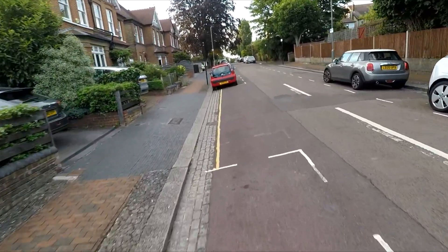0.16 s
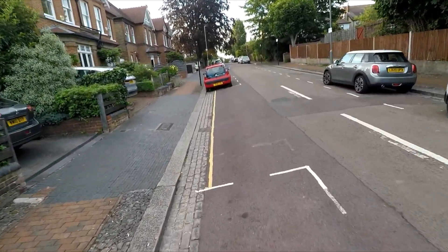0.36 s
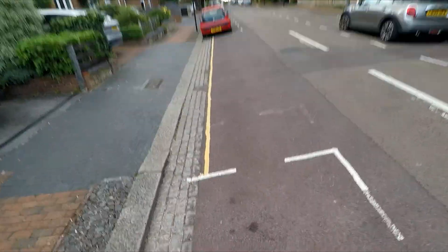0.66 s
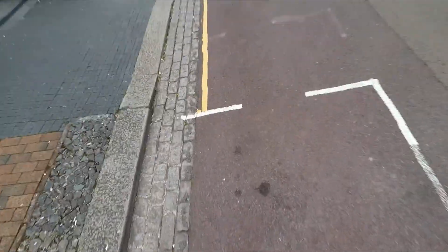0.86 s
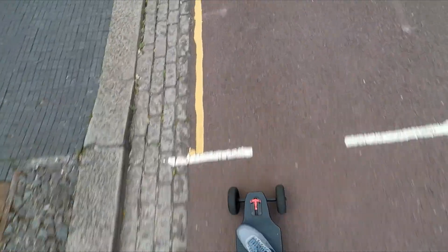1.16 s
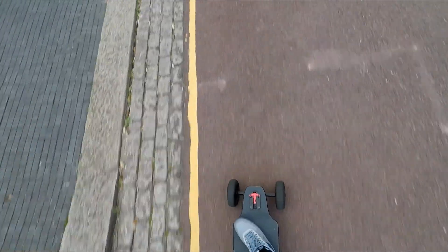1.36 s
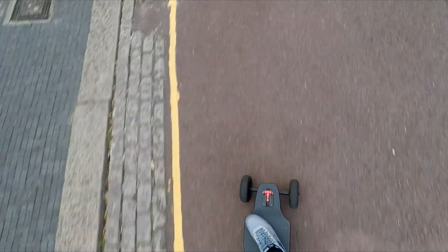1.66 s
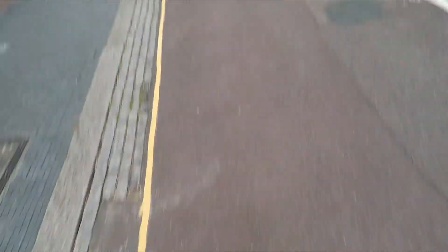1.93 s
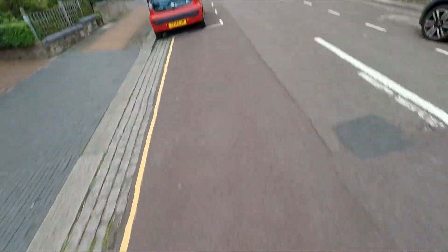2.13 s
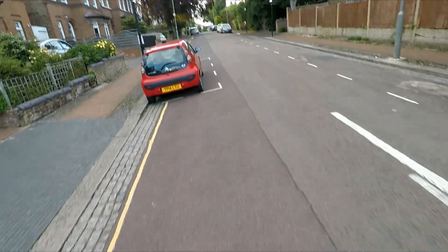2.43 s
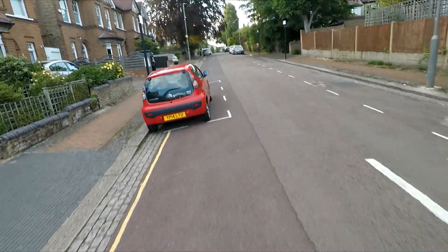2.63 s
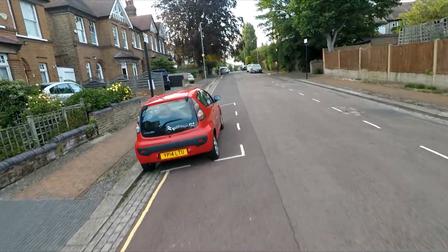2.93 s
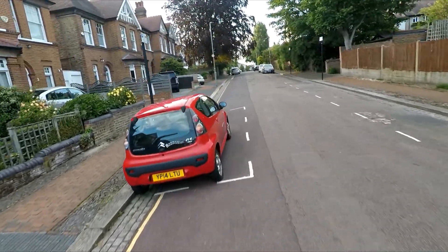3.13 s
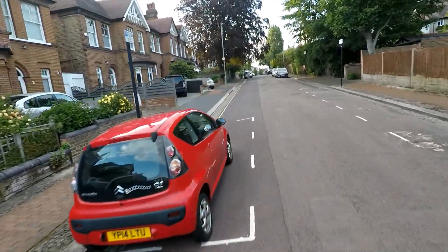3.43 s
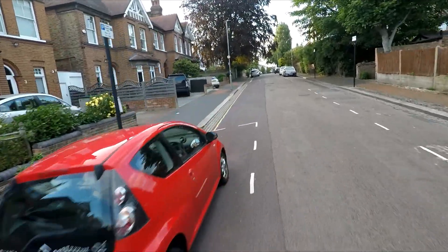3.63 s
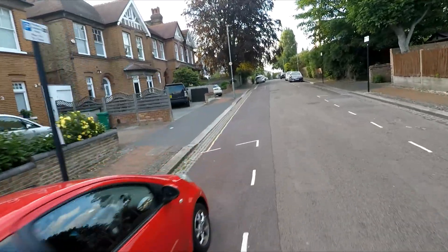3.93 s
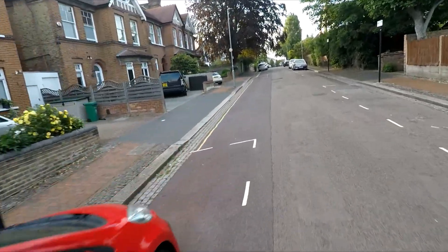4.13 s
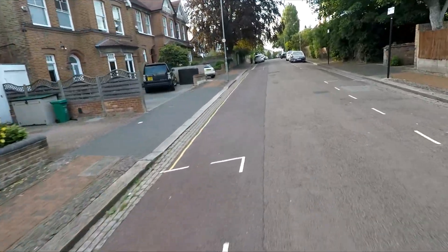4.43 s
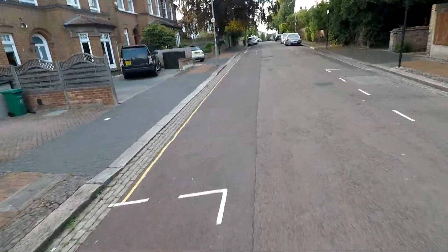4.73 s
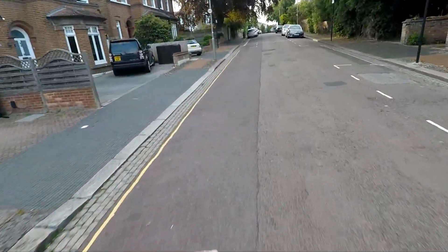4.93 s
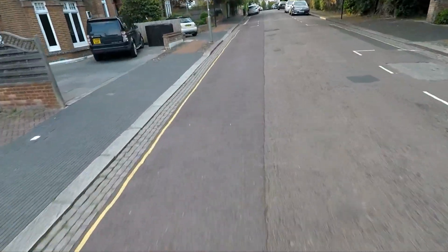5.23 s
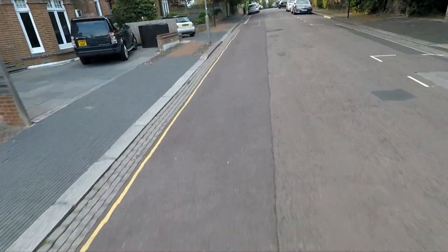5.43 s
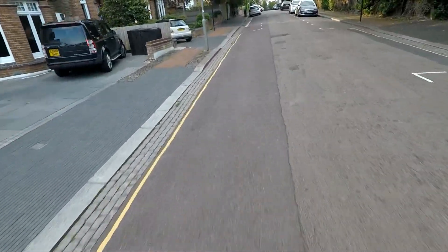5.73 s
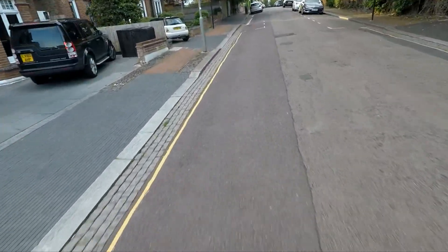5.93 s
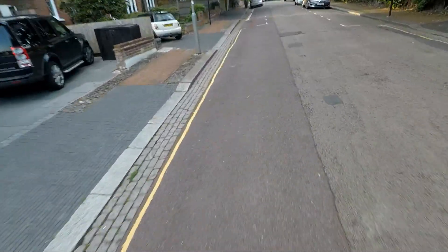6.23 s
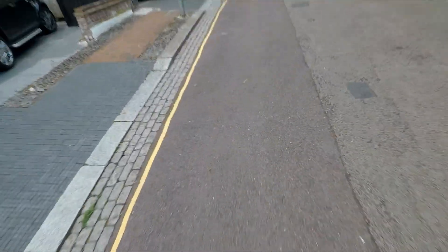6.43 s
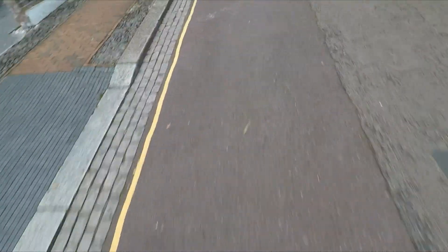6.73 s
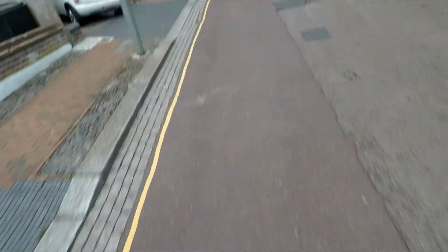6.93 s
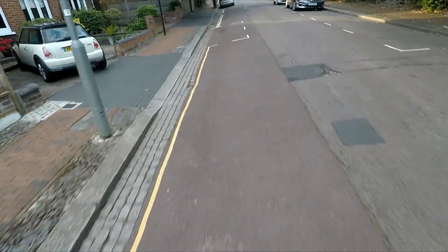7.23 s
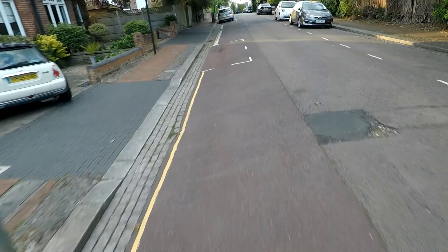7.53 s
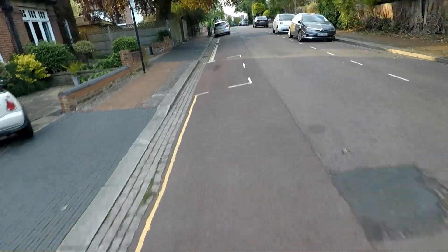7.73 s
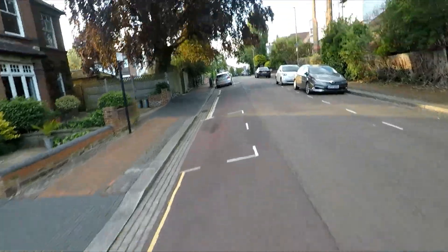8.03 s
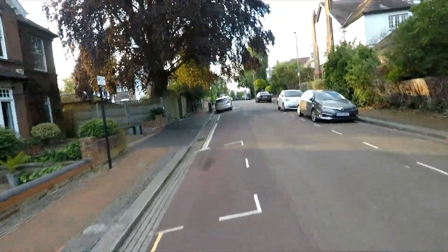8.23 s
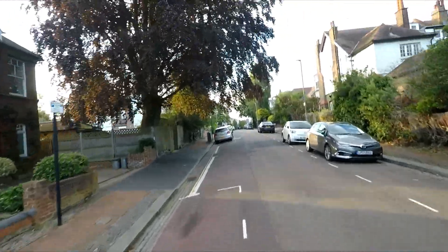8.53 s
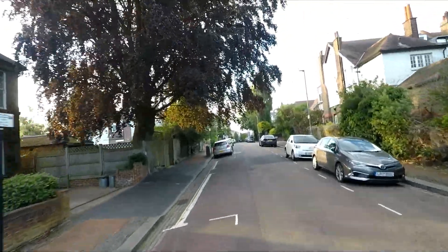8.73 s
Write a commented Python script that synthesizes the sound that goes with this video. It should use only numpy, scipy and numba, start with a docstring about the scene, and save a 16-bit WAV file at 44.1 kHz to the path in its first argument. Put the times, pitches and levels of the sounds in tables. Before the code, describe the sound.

Deep wind buffets the microphone as an electric skateboard's tyres hum along asphalt, with light rattles and ticks of grit.

```python
"""Booming headwind and the hum of tyres on asphalt, heard from a camera worn on an electric skateboard.
Eddies shed by the housing make the boom, and turbulence gusts and hisses at each microphone port.
The tyres drive the deck's resonances, sand and grit tick, loose parts rattle and bumps jolt an axle mount.
A faint high band of noise comes and goes, air moans at the left port by a parked car, a whoosh comes late.
The camera widens its stereo by subtracting part of each port from the other."""
import sys
import numpy as np
from scipy import signal
from scipy.fft import rfft, irfft
from scipy.io import wavfile
from scipy.ndimage import uniform_filter1d
from numba import njit

SR = 44100
rng = np.random.default_rng(int(sys.argv[2]) if len(sys.argv) > 2 else 0)


def file_out(sig):
    """Save sig as 16-bit WAV at sys.argv[1]."""
    # one column per channel
    cols = np.atleast_2d(sig).T
    # limit, then scale
    lim = np.clip(cols, -1, 1)
    pcm = np.round(lim * 32767).astype(np.int16)
    wavfile.write(sys.argv[1], SR, pcm)


N = 391166

# relative levels of the ride, louder when the camera looks down: time_s, deck_db, rattle_db, rush_db
RIDE_LEVELS = [(0.0, -37.5, -70, -51), (0.49, -42, -60, -55), (1.0, -34.5, -58, -52),
               (1.3, -33.5, -55, -49.5), (1.68, -34.5, -56.5, -47.5), (1.8, -35, -52, -50),
               (2.07, -36, -66, -51.5), (2.5, -39.5, -80, -49.5), (3.2, -39.5, -71, -49.5),
               (3.9, -36.5, -81, -47.5), (4.05, -37, -84, -44.5), (5.1, -32.5, -63.5, -46),
               (6.13, -32.5, -59, -45.5), (6.67, -27.5, -51.5, -45.5), (7.21, -29.5, -56.5, -44.5),
               (7.73, -30.5, -55.5, -44.5), (8.3, -30, -55, -44), (8.87, -34.5, -64, -41.5)]
# resonances of the deck: centre_hz, width_hz, gain_db
DECK_MODES = [(315.4, 91, -3.5), (449, 102, 4), (530, 108, -10), (885, 187, -9.5), (1660, 460, -26.5)]
# resonances of the loose parts: centre_hz, width_hz, gain_db
LOOSE_MODES = [(2740, 610, -0.5), (4440, 800, -12.5)]


def undb(db):
    return 10 ** (np.asarray(db) / 20)


def unit(x):
    return x / np.sqrt(np.mean(x ** 2))


def noise():
    return rng.standard_normal(N)


def curves(table):
    """Each column after the time, interpolated to one value a sample."""
    time_s, *columns = np.transpose(table)
    return [np.interp(np.arange(N) / SR, time_s, column) for column in columns]


def wander(rate_hz):
    """Smooth random fluctuation with a spread near 1."""
    hold = int(SR / rate_hz)
    steps = np.repeat(rng.standard_normal(N // hold + 1), hold)
    return 0.868 * uniform_filter1d(uniform_filter1d(steps, hold), hold)[:N]


def swell(peak_s, half_width_s):
    """Gaussian envelope, 1 at its peak and 1/e a half-width away."""
    offset_s = np.arange(N) / SR - peak_s
    return np.exp(-(offset_s / half_width_s) ** 2) * (np.abs(offset_s) < 0.3)


@njit
def sweep(x, hz, damping):
    """State-variable band-pass with a moving centre; damping is bandwidth over centre frequency."""
    y, band, low = np.empty(len(x)), 0., 0.
    for i in range(len(x)):
        g = np.tan(np.pi * hz[i] / SR)
        v = (band + g * (x[i] - low)) / (1 + g * (g + damping))
        band, low, y[i] = 2 * v - band, low + 2 * g * v, damping * v
    return y


def narrow_noise(hz, damping):
    """Noise confined to a band round a moving centre."""
    return unit(sweep(sweep(noise(), hz, damping), hz, damping))


def resonate(x, hz, width_hz):
    """Second-order resonator with gain 1 at its centre."""
    g = np.tan(np.pi * hz / SR)
    k = g * width_hz / hz
    return signal.lfilter([k, 0, -k], [1 + k + g * g, 2 * (g * g - 1), 1 - k + g * g], x)


def ring(x, modes):
    """Sum of modes (centre_hz, width_hz, gain_db), each filtered twice to deepen the valleys between."""
    return sum(undb(db) * resonate(resonate(x, hz, width), hz, 2 * width) for hz, width, db in modes)


def shaped(x, response, to_gain):
    """Filter by (frequency_hz, value) points joined on a log-frequency axis."""
    hz, value = np.transpose(response)
    bin_hz = np.arange(N // 2 + 1) * SR / N
    return irfft(rfft(x) * to_gain(np.interp(np.log(bin_hz + 1), np.log(hz), value)), N)


def ports(x, pan_db, lag_s):
    """Path difference: an off-centre sound reaches the left port later; pan_db is left minus right."""
    late = np.interp(np.arange(N) - lag_s * SR, np.arange(N), x)
    return np.array([late * undb(pan_db / 2), x * undb(-pan_db / 2)])


def tilt_pan(time_s, ahead_db, down_db):
    """The left-minus-right level of sounds from the board shifts as the camera tips down."""
    # camera tilt, 0 ahead to 1 down: time_s, tilt_share
    tilt = [(0.0, 0.09), (0.55, 1), (1.0, 0.91), (1.9, 1), (2.2, 0), (6.0, 0.7), (6.5, 0.76), (7.0, 0.72),
            (7.3, 0.41), (8.87, 0.)]
    return ahead_db + (down_db - ahead_db) * np.interp(time_s, *np.transpose(tilt))


def blow_envelope(starts_s, levels_db, lengths_ms, rebound_db):
    """Each impact rises in about 2 ms, fades over its length and rebounds once."""
    envelope, rebound_s = np.zeros(N), 0.0086
    for start_s, db, length_ms in np.broadcast(starts_s, levels_db, lengths_ms):
        i = int(start_s * SR)
        ms = np.arange(min(int(0.04 * SR), N - i)) * 1000 / SR
        attack = 1 - np.exp(-(ms / 2) ** 2)
        envelope[i:i + len(ms)] += undb(db) * attack * np.exp(-(ms / length_ms) ** 3)
    return envelope + undb(rebound_db) * np.roll(envelope, int(rebound_s * SR))


def knocks(start_s, level_db, pan_db, length_ms, modes, rebound_db=-4):
    """Impact excitation: short stereo bursts of noise coloured by the struck body's modes."""
    window = int(np.mean(length_ms) * SR / 1000)
    carrier = np.zeros(N)
    for hz, width_hz, gain_db in modes:
        mode = ring(noise(), [(hz, width_hz, 0)])
        # even out the power, so that the envelope sets each blow's strength
        carrier += undb(gain_db) * mode / np.sqrt(uniform_filter1d(mode ** 2, window))
    envelopes = [blow_envelope(start_s, level_db + side * pan_db / 2, length_ms, rebound_db)
                 for side in (1, -1)]
    return undb(-6) * unit(carrier) * np.array(envelopes)


def boom():
    """Vortex shedding: eddies leave the housing at a wavering rate, over a deeper, shapeless thud."""
    # slowly changing headwind: time_s, level_db
    headwind = [(0.0, -20), (0.15, -18), (0.72, -28.5), (1.1, -20.5), (1.78, -21.5), (1.9, -25),
                (2.65, -31), (2.8, -24), (3.1, -30), (3.6, -22), (4.6, -17), (4.85, -19.5), (5.4, -18.5),
                (5.86, -15), (6.55, -23.5), (7.2, -22), (7.7, -22.5), (8.0, -20), (8.87, -20)]
    # single heavy buffets: peak_s, level_db
    buffets = [(0.83, -13), (3.42, -18), (4.39, -9), (5.3, -9), (6.16, -10.5), (6.76, -15), (7.27, -20),
               (7.41, -15), (7.97, -15), (8.13, -22)]
    shedding_hz, buffet_s, cutoff_hz = 55.67, 0.028, 70
    strength = undb(curves(headwind)[0])
    buffet_power = sum(undb(db) ** 2 * swell(peak_s, buffet_s) for peak_s, db in buffets)
    eddy_hz = shedding_hz * (1 + 0.0968 * wander(14))
    eddies = unit(np.sin(2 * np.pi * np.cumsum(eddy_hz) / SR) * undb(3 * wander(12)))
    port_thud = np.array([unit(resonate(noise(), 53, 55)) for _ in range(2)])
    thud = undb(2.5) * unit(resonate(noise(), 42.7, 19)) + undb(-8) * port_thud
    pressure = eddies * np.sqrt(strength ** 2 + buffet_power) + thud * strength
    pressure *= undb([[-1.6], [-2.4]])  # nearly equal at both ports
    # the housing is too large to shed quicker eddies
    return signal.sosfilt(signal.butter(6, cutoff_hz, fs=SR, output="sos"), pressure)


def port_wind(steady, port):
    """Incoherent addition: wind and puffs sum in power, and the louder sets the centre frequency."""
    # short puffs on one port (-1 left, 1 right):
    # peak_s, side, level_db, centre_hz, flutter_above_db, half_width_s
    puffs = [(2.566, -1, -26.5, 149, -27, 0.048), (4.812, -1, -29, 182, -16, 0.074),
             (4.805, 1, -25, 141, -20, 0.042), (5.03, -1, -24, 162, -10.5, 0.057),
             (5.194, -1, -18.5, 208, 1, 0.019), (5.39, -1, -24, 180, -5.5, 0.075),
             (6.176, -1, -20.5, 136, -9.5, 0.044), (6.196, 1, -29, 139, -2.5, 0.028),
             (6.677, 1, -24.5, 140, -12, 0.02), (6.85, 1, -28, 140, -11, 0.045),
             (7.19, -1, -20.5, 196, -9, 0.081), (7.74, -1, -18.5, 151, -17, 0.045),
             (8.04, 1, -28, 140, -15, 0.024), (8.043, -1, -20.5, 124, -40, 0.1),
             (8.68, 1, -26.5, 140, -5.5, 0.1), (8.815, -1, -26.5, 137, -30, 0.014)]
    db, hz, flutter_db = curves(steady)
    body_power, flutter_power = undb(db) ** 2, undb(flutter_db) ** 2
    weighted_hz = body_power * hz
    for peak_s, side, puff_db, puff_hz, above_db, half_width_s in puffs:
        if side == port:
            puff_power = undb(puff_db) ** 2 * swell(peak_s, half_width_s)
            body_power += puff_power
            weighted_hz += puff_power * puff_hz
            flutter_power += puff_power * undb(above_db) ** 2
    return 10 * np.log10(body_power), weighted_hz / body_power, 10 * np.log10(flutter_power)


def turbulence(steady, port, damping, flutter_hz, db_per_octave, throb_db):
    """Turbulent pressure at one port: a low body and a flutter whose band rises with its level."""
    body_db, body_hz, flutter_db = port_wind(steady, port)
    throb = undb(throb_db * wander(40) + 1.1 * wander(9))
    body = unit(narrow_noise(body_hz, damping) * throb)
    centre_hz = np.clip(flutter_hz * 2 ** ((flutter_db + 28) / db_per_octave), 200, 1500)
    flutter = noise() / np.sqrt(centre_hz)
    for _ in range(8):  # repeated passes steepen the band's edges
        flutter = sweep(flutter, centre_hz, 2.44)
    return undb(body_db) * body + undb(flutter_db) * unit(flutter * throb)


def gusts():
    """Spatial coherence: each port has its own turbulence, while the lowest eddies reach both."""
    # wind on the left port, strongest beside the parked car: time_s, level_db, centre_hz, flutter_db
    left_wind = [(0.0, -41, 104, -48), (1.83, -74, 105, -39), (2.42, -33, 116, -55), (2.7, -30, 138, -45),
                 (2.9, -28.5, 157, -36.5), (3.15, -28.5, 197, -30), (3.45, -22.5, 211, -26),
                 (3.76, -24.5, 223, -23.5), (3.88, -16, 190, -19), (4.0, -32.5, 174, -37),
                 (4.6, -39, 121, -38.5), (5.8, -41, 169, -35), (6.5, -29.5, 171, -32),
                 (6.85, -37, 123, -39), (7.65, -25.5, 187, -22.5), (7.9, -31.5, 164, -27.5),
                 (8.2, -23, 120, -29.5), (8.87, -28, 186, -28.5)]
    # wind on the right port: time_s, level_db, centre_hz, flutter_db
    right_wind = [(0.0, -44, 118, -43), (2.3, -60, 119, -50), (2.7, -40.5, 126, -44.5),
                  (4.6, -36, 142, -38.5), (6.1, -36.5, 143, -39.5), (6.55, -30.5, 139, -37.5),
                  (6.95, -29, 141, -41), (7.3, -36.5, 140, -35), (7.65, -30, 140, -31),
                  (7.87, -27, 142, -31.5), (8.12, -26.5, 137, -30), (8.2, -28.5, 140, -29),
                  (8.42, -22.5, 142, -29), (8.48, -32, 140, -35), (8.6, -41, 141, -32.5),
                  (8.87, -33.5, 137, -33.5)]
    # low eddies common to both ports: time_s, level_db
    common_wind = [(0.0, -40), (1.0, -39), (2.3, -41), (3.3, -34), (4.6, -31), (6.1, -33.5), (6.95, -29),
                   (7.87, -28.5), (8.6, -32.5), (8.87, -25.5)]
    left = turbulence(left_wind, port=-1, damping=0.75, flutter_hz=371, db_per_octave=93, throb_db=2)
    right = turbulence(right_wind, port=1, damping=2.2, flutter_hz=750, db_per_octave=49, throb_db=5)
    common = undb(curves(common_wind)[0]) * unit(ring(noise(), [(101.4, 51, 0)]))
    return np.array([left, right]) + common


def deck_hum():
    """Forced vibration: tyres on rough asphalt drive the deck's modes and a wandering hum."""
    # rough patches that swell the hum: peak_s, added_db, half_width_s
    rough_patches = [(1.04, 7, 0.029), (1.297, 3.5, 0.025), (1.785, 4.5, 0.063), (2.086, 4.5, 0.026),
                     (6.45, 3, 0.037), (6.673, 2, 0.056), (6.88, 0, 0.089), (7.573, 1, 0.077),
                     (7.89, 5, 0.093)]
    modes = unit(ring(noise() * undb(2.2 * wander(11)), DECK_MODES))
    hum_hz = 492 * (1 + 0.035 * wander(9))
    deck = modes + undb(-3) * narrow_noise(hum_hz, damping=0.07)
    surge_db = sum(db * swell(peak_s, half_width_s) for peak_s, db, half_width_s in rough_patches)
    deck_db = curves(RIDE_LEVELS)[0] + surge_db - 4
    return ports(undb(deck_db) * deck, pan_db=4.4, lag_s=0.0001)


def shot_noise(per_s, spread_db, cap_db, length_s):
    """A Poisson process of tiny noise bursts of uneven strength."""
    arrivals = rng.random(N) < per_s / SR
    strengths = undb(np.minimum(spread_db * rng.exponential(size=N), cap_db))
    return noise() * uniform_filter1d(arrivals * strengths, int(length_s * SR))


def chatter():
    """Random excitation: small stones jog the loose parts, over the rasp of the tread."""
    # bands of the tread's rasp: centre_hz, width_hz, gain_db
    tread_bands = [(1770, 480, -0.5), (5900, 1300, -11)]
    jogs = shot_noise(per_s=170, spread_db=2.5, cap_db=5, length_s=0.0021)
    loose = ring(undb(1) * unit(jogs) + noise(), LOOSE_MODES)
    rasp = ring(noise(), tread_bands)
    rattle_db = curves(RIDE_LEVELS)[1]
    return ports(undb(rattle_db) * unit(loose + rasp), pan_db=-1.5, lag_s=0.00008)


def air():
    """Flow noise: air rushes past the rider and hisses at the ports, both flickering quickly."""
    # spectrum of the hiss at the ports: frequency_hz, density_db
    hiss_spectrum = [(2000, -13), (3000, -3.5), (4200, 0.5), (4900, -4), (5600, 1), (6500, 2.5),
                     (7600, 4.5), (8600, -1), (10000, -3.5), (12000, -12), (14500, -22.5)]
    rush_bands = [(983, 470, -1.2), (1380, 646, -0.4)]
    deck_db, _, rush_db = curves(RIDE_LEVELS)
    hiss_db = -58 + 0.29 * (deck_db + 35)  # the hiss grows with the deck's level
    rush = np.array([unit(ring(noise(), rush_bands)) * undb(db) for db in (-3, 3)])
    common = 0.45 * noise()
    hiss = np.array([unit(shaped(noise() + common, hiss_spectrum, undb)) * undb(db) for db in (-1.5, 1.5)])
    flicker_db = 1.3 * wander(20) + 1.4 * wander(70)
    return undb(rush_db + wander(22)) * rush + undb(hiss_db + flicker_db) * hiss


def sand():
    """Shot noise: fine sand thrown up by the wheels crackles, more on rough asphalt."""
    grains = shot_noise(per_s=260, spread_db=3, cap_db=8.5, length_s=0.0015)
    crackle = unit(ring(grains, [(3130, 620, 1), (5900, 1600, 0), (7800, 1900, -2)]))
    rattle_db = curves(RIDE_LEVELS)[1]
    level_db = -64.5 + 0.5 * (rattle_db + 60)
    return ports(undb(level_db) * crackle, pan_db=-1, lag_s=0.00005)


def grit():
    """Brief impacts excite high modes: grit from the wheels ticks, and larger stones add a duller part."""
    # grit strikes: start_s, level_db, dull_above_db
    ticks = [(0.043, -34.5, -3), (0.065, -40, -14), (0.082, -44, -16), (0.093, -48, -18), (0.19, -46, 0),
             (0.85, -40, 1), (1.342, -47, 8), (1.369, -39, 0), (1.3997, -43, 0), (2.035, -50, 2),
             (2.091, -47, 4), (2.4648, -40, -5), (2.488, -41, -14), (3.355, -40, -24), (4.155, -32, -11),
             (4.2062, -34.5, -15), (4.3248, -34.5, -6), (5.104, -38.5, 3), (5.7756, -41, -14),
             (5.936, -41, -15), (5.952, -42, -10), (5.967, -48, -5), (6.085, -48, -4), (6.119, -46, -15),
             (6.271, -45, -1), (6.32, -46, -6), (6.384, -46, -18), (6.437, -51, 9), (6.4908, -46, -9),
             (6.504, -45, 5), (6.601, -46, 4), (6.808, -44, 2), (6.82, -47, 5), (6.986, -35.5, -2),
             (7.1567, -39, -20), (7.6107, -46, 7), (7.808, -44, -20), (8.082, -44, -10)]
    # resonances struck by grit: centre_hz, width_hz, gain_db
    grit_modes = [(7560, 1600, 13), (8450, 670, -1), (10300, 2500, -3.5)]
    # resonances added by larger stones: centre_hz, width_hz, gain_db
    stone_modes = [(4350, 890, -4), (5640, 1000, -1)]
    start_s, level_db, dull_db = np.transpose(ticks)
    pan_db, length_ms = tilt_pan(start_s, ahead_db=-9, down_db=2), 4.8
    bright = knocks(start_s, level_db, pan_db, length_ms, grit_modes, rebound_db=-10)
    dull = knocks(start_s, level_db + dull_db, pan_db, length_ms, stone_modes, rebound_db=-10)
    return bright + dull


def rattles():
    """Mechanical coupling: each clack of a loose part also thumps the deck."""
    # distinct blows of the loose parts: start_s, level_db
    blows = [(0.526, -38), (0.546, -43), (0.84, -43.5), (0.9672, -44), (1.042, -34), (1.0927, -38.5),
             (1.1194, -42), (1.1825, -38), (1.2133, -38.5), (1.286, -41), (1.3079, -43), (1.342, -38.5),
             (1.371, -39), (1.39, -43), (1.482, -33), (1.516, -40), (1.5664, -38), (1.62, -39.5),
             (1.6716, -42), (1.813, -34.5), (1.834, -40), (1.984, -40), (2.082, -44), (4.964, -45),
             (5.104, -36), (5.7642, -35), (5.837, -39.5), (5.963, -37), (6.084, -40), (6.2725, -41),
             (6.317, -34.5), (6.3839, -39.5), (6.502, -32.5), (6.526, -36), (6.651, -38), (6.6786, -36),
             (6.769, -41), (6.822, -40), (7.1841, -42), (7.331, -38), (7.59, -36), (7.6097, -36.5)]
    start_s, level_db = np.transpose(blows)
    pan_db = tilt_pan(start_s, ahead_db=-21, down_db=2.5)
    clacks = knocks(start_s, level_db, pan_db, length_ms=5.1, modes=LOOSE_MODES)
    thumps = knocks(start_s, level_db + 11.5, pan_db, length_ms=10.8, modes=DECK_MODES)
    return clacks + thumps


def bumps():
    """Shock excitation: bumps under the wheels jolt the axle mount into its modes."""
    # jolts from the road: start_s, level_db, pan_db, length_ms
    jolts = [(0.527, -36, -16, 7.7), (0.547, -44, -5, 4.4), (5.765, -31, -6, 11)]
    # resonances of the axle mount: centre_hz, width_hz, gain_db
    mount_modes = [(508, 300, 4), (960, 750, 28), (1460, 750, -20)]
    return knocks(*np.transpose(jolts), mount_modes)


def high_band():
    """Band-pass filtering: a faint, wavering, narrow band of noise near 8.8 kHz comes and goes."""
    # strength of the band: time_s, level_db
    levels = [(0.0, -93), (2.25, -86.5), (2.36, -71), (2.65, -69), (3.0, -84), (5.25, -85), (5.4, -72),
              (5.95, -73), (6.15, -90), (8.87, -85)]
    centre_hz = 8850 * (1 + 0.014 * wander(24))
    thin = undb(curves(levels)[0]) * narrow_noise(centre_hz, damping=0.03)
    return ports(thin, pan_db=-2.5, lag_s=0.00003)


def moan():
    """Flow-induced tone: air crossing the left port beside the parked car gives a breathy moan."""
    # course of the moan: time_s, pitch_hz, level_db
    course = [(2.9, 150, -50.5), (3.02, 165.3, -15), (3.07, 269, -25.5), (3.2, 240.1, -33),
              (3.29, 226.5, -18), (3.42, 223, -24.5), (3.5, 224.2, -34), (3.56, 239, -26), (3.62, 270, -30),
              (3.74, 281.6, -15), (3.8, 293, -44.5)]
    pitch_hz, level_db = curves(course)
    wavering_hz = pitch_hz * (1 + 0.0433 * wander(70))
    tone = np.sqrt(2) * np.sin(2 * np.pi * np.cumsum(wavering_hz) / SR)
    breath = narrow_noise(pitch_hz, damping=0.23)
    left = (tone + breath) * undb(level_db - 4 + 1.2 * wander(25))
    return np.array([left, np.zeros(N)])


def whoosh():
    """Band-limited flow noise: a whoosh of air swells late in the ride, louder on the left."""
    # course of the whoosh: time_s, centre_hz, level_db
    course = [(8.0, 900, -53), (8.17, 916, -39), (8.25, 1100, -38), (8.38, 1110, -39), (8.46, 1088, -47),
              (8.68, 1050, -43), (8.87, 1110, -45)]
    centre_hz, level_db = curves(course)
    return ports(undb(level_db) * narrow_noise(centre_hz, damping=0.23), pan_db=4, lag_s=0.00006)


def scene():
    """Superposition: the pressures of all the sounds add at the two ports."""
    rolling = boom() + gusts() + deck_hum() + chatter() + air() + sand()
    return rolling + grit() + rattles() + bumps() + high_band() + moan() + whoosh()


def record(dry):
    """Cross-subtraction widens the image; soft saturation rounds the peaks and a low-pass cuts the top."""
    # part of the other port taken out of each channel: frequency_hz, share
    cross_feed = [(60, 0.09), (130, 0), (280, 0.06), (650, 0.39), (1100, 0.45), (1800, 0.09), (2800, 0.05),
                  (7000, 0.19), (12000, 0.04)]
    cutoff_hz = 14300
    wide = dry - shaped(dry[::-1], cross_feed, np.abs)
    rounded = np.tanh(0.88 * wide) / 0.73
    return signal.sosfilt(signal.ellip(8, 0.2, 70, cutoff_hz, fs=SR, output="sos"), rounded)


dry = scene()
out = record(dry)
file_out(out)
```